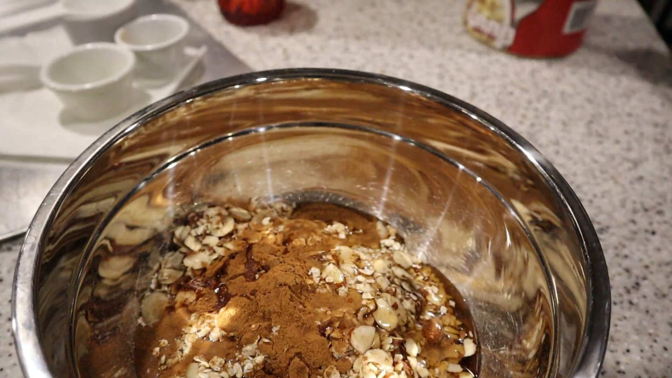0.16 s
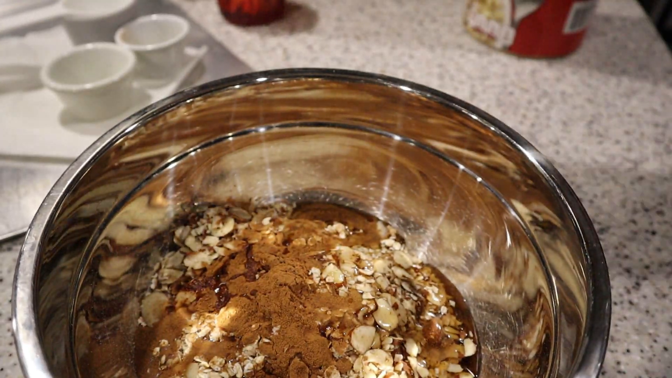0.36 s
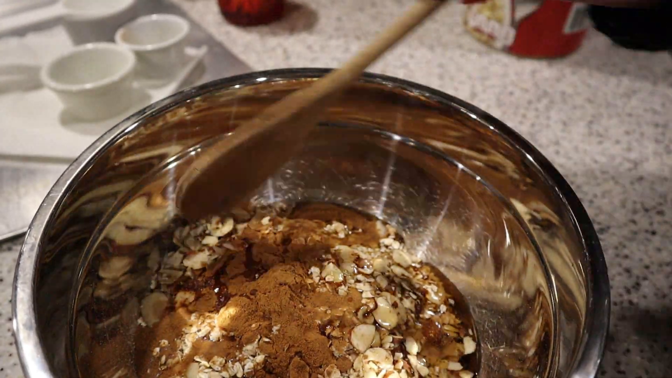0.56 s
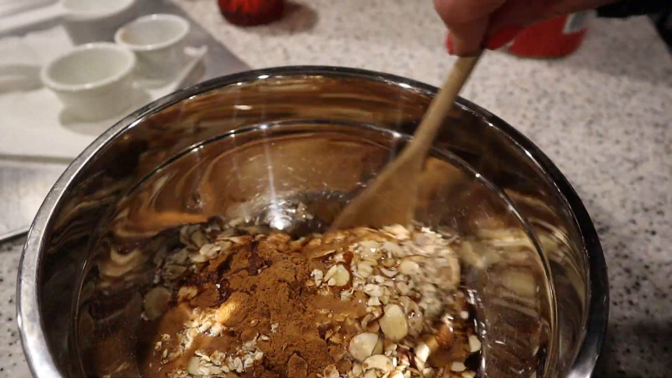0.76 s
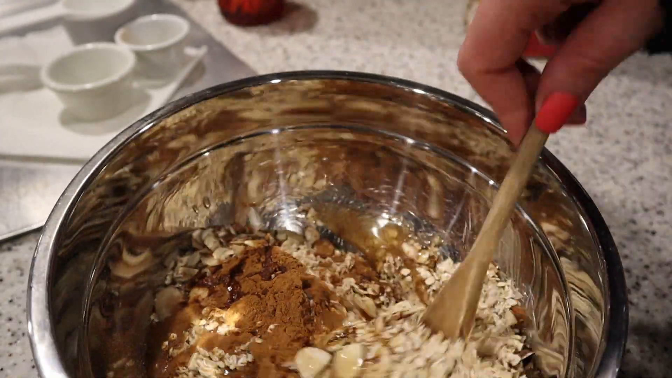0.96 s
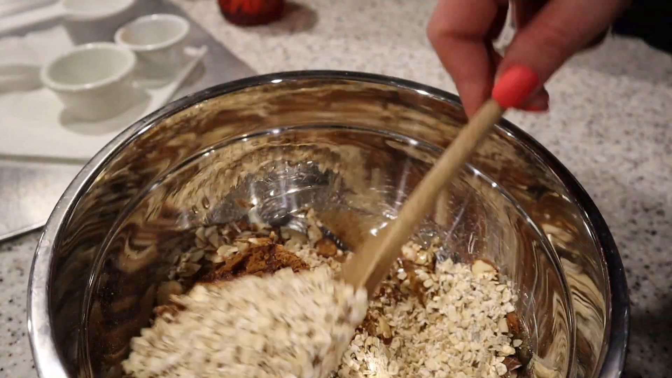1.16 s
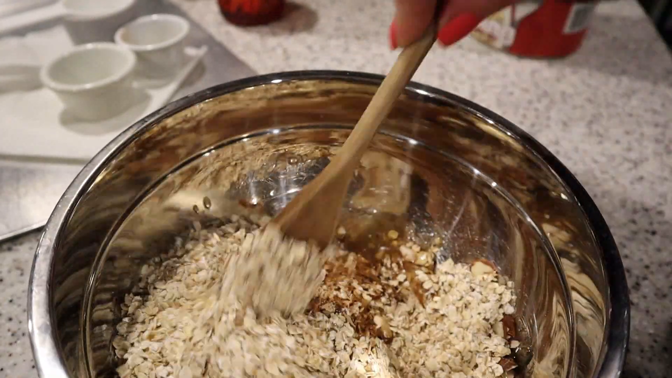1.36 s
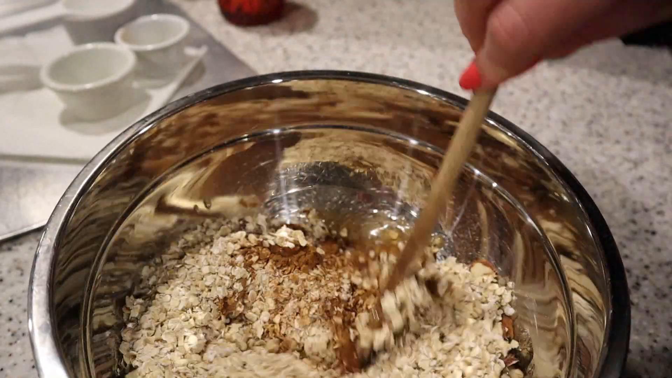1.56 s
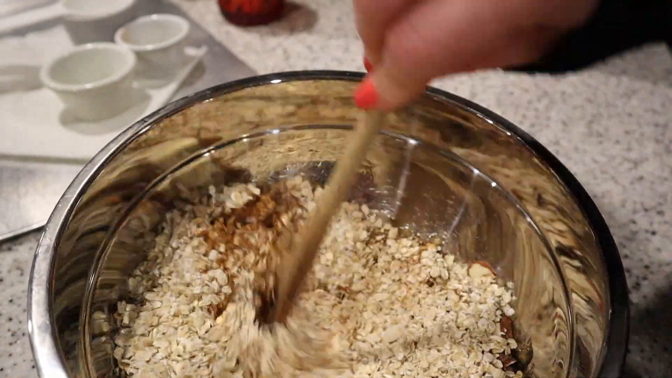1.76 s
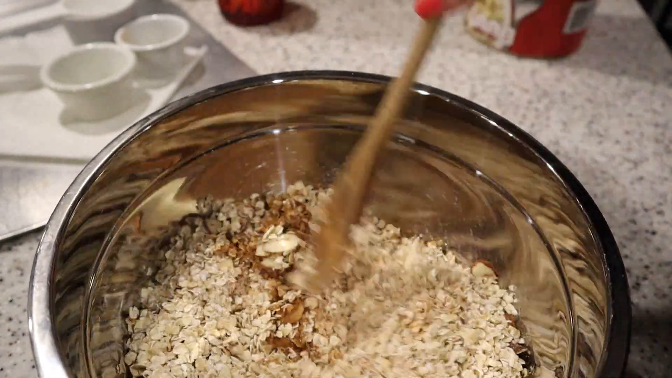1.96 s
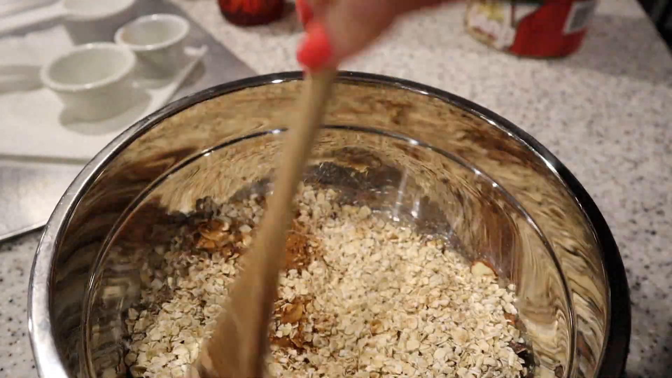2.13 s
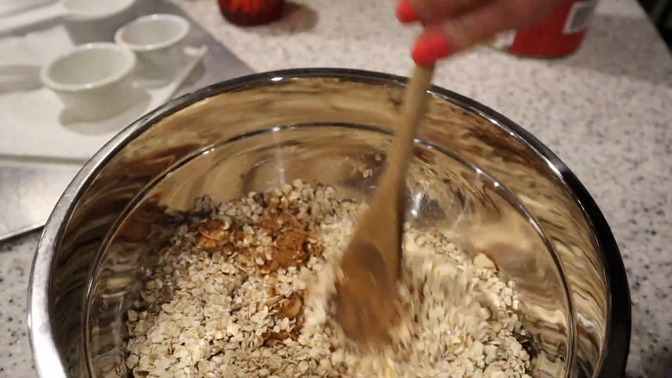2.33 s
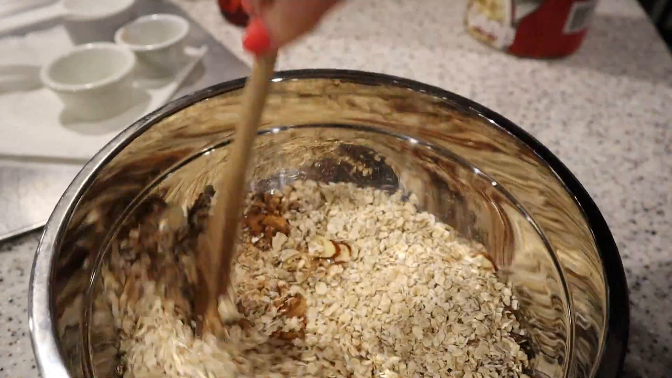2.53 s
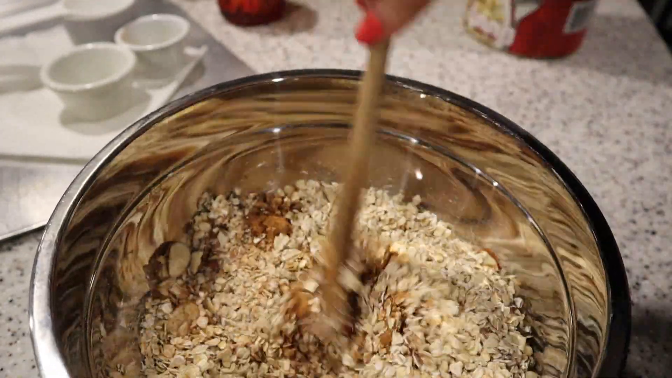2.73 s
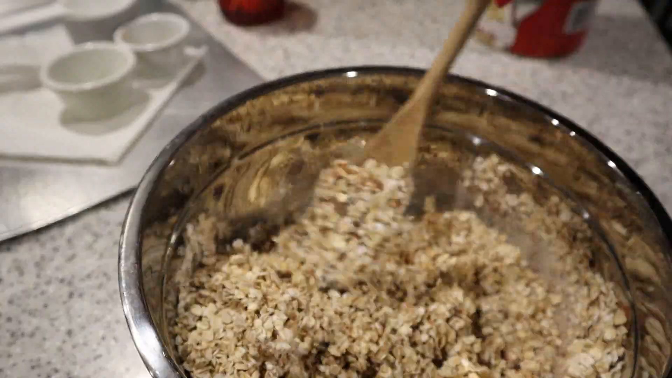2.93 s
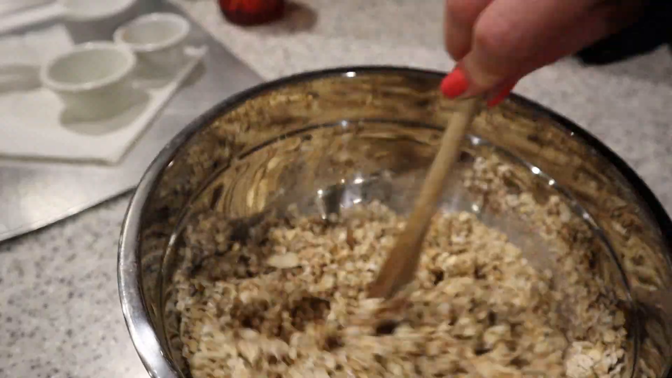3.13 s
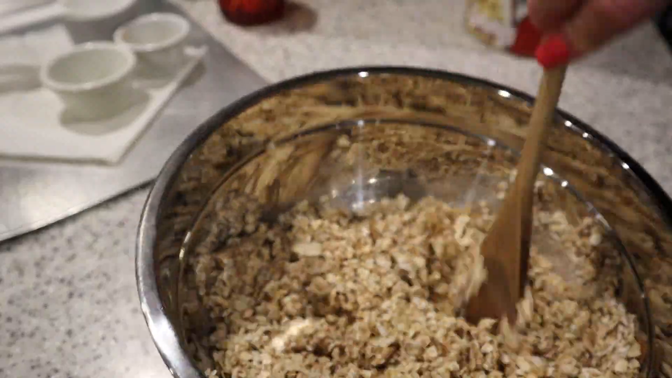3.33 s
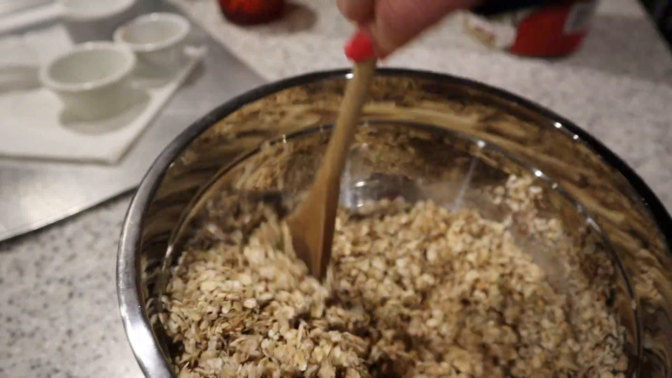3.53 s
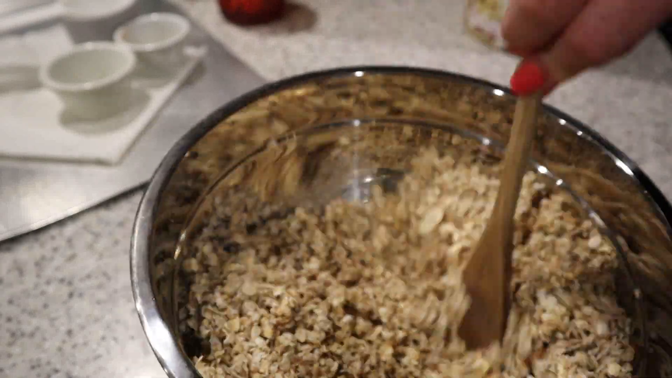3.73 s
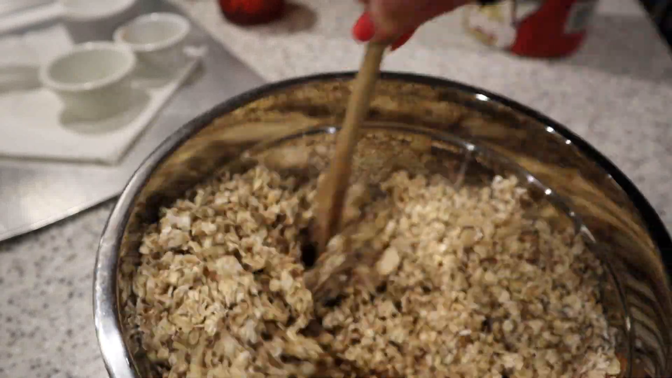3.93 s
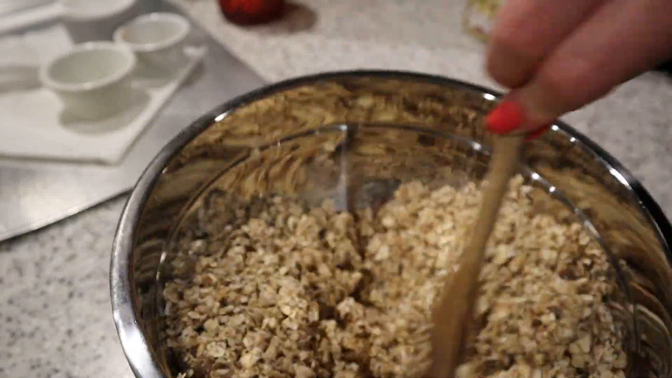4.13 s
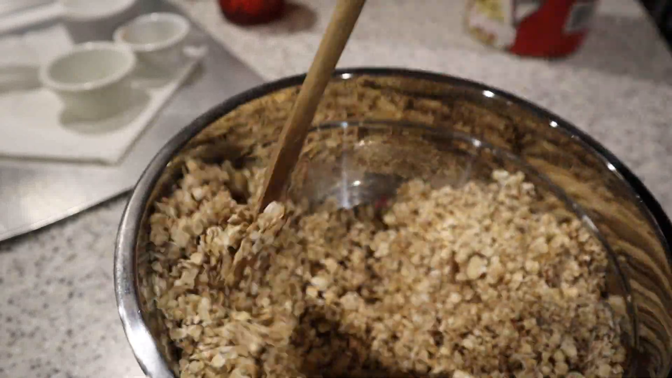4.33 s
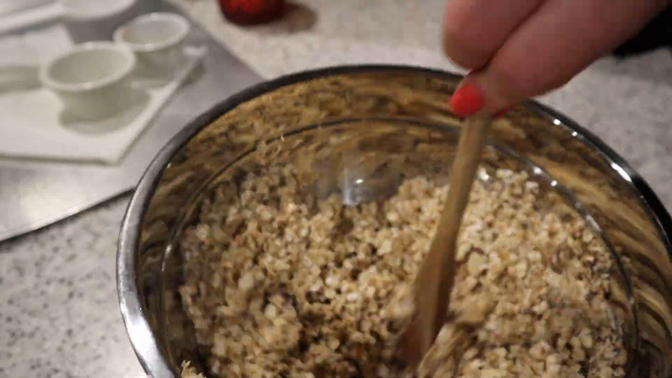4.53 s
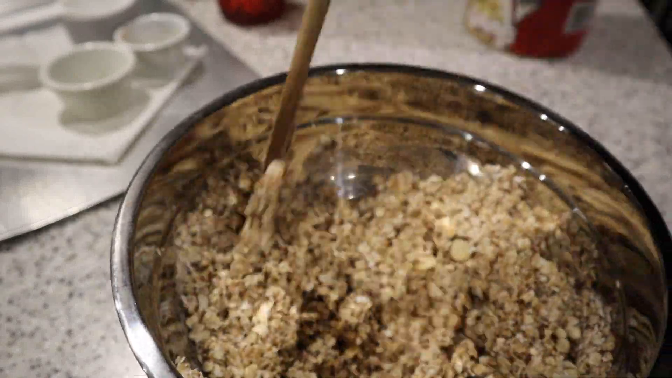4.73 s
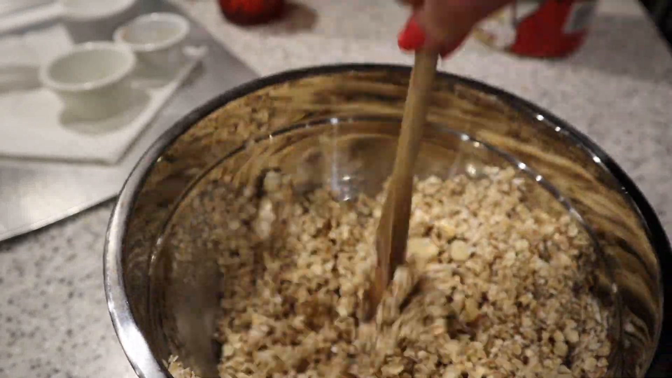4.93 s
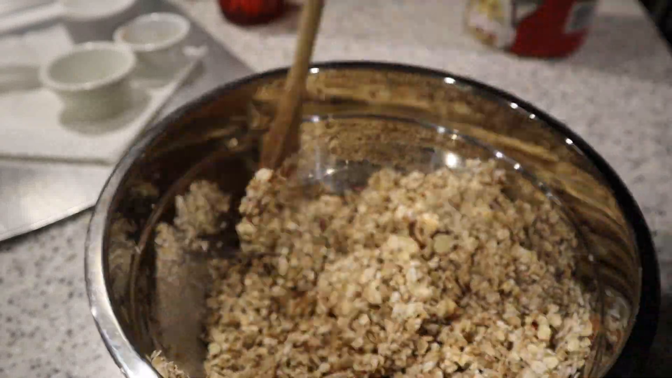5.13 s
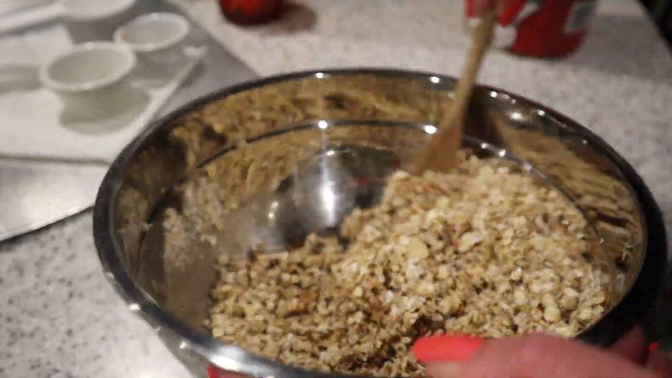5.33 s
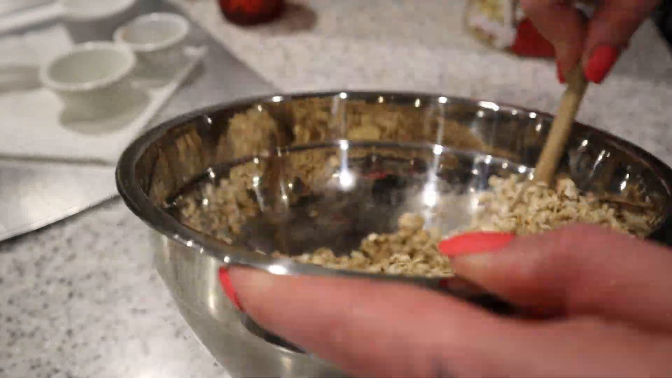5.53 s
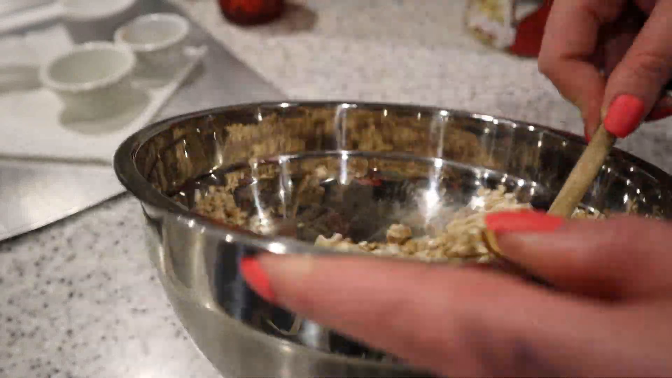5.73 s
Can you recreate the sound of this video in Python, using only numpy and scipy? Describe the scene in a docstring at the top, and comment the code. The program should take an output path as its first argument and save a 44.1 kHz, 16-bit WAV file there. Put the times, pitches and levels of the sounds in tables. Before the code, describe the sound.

Close-up kitchen stirring: a hard wood-on-metal clack, then crunchy oat strokes with pinging nuts, small snaps and dull thumps over low hum.

```python
"""Close to a small stereo microphone on a kitchen counter, over steady hum (coloured noise): soft brushing noise swishes
and one faint knock lead in, then a wooden spoon lands on a steel bowl with a cracking, ringing clack (pulse and modes).
Strokes through oats, nuts and syrup follow to the end: grains of noise rustle and crunch, flakes spill, nuts ping
and skitter, brittle bits snap. Stick-slip tones squeak and filtered grit scrapes now and then; further knocks make the
bowl thump on the counter (low modes), hardest around 3 s. A short diffuse tail sets it all in a small room."""
import sys
import numpy as np
from scipy import signal
from scipy.fft import rfft, irfft
from scipy.io import wavfile
from scipy.ndimage import uniform_filter1d

SR = 44100
rng = np.random.default_rng(int(sys.argv[2]) if len(sys.argv) > 2 else 0)


def dump(signal):
    """Clip the signal to [-1, 1] and save it as 16-bit WAV at the path in sys.argv[1]."""
    limited = np.clip(np.atleast_2d(signal).T, -1, 1)
    pcm = np.round(limited * 32767).astype(np.int16)
    wavfile.write(sys.argv[1], SR, pcm)


N = 254898  # samples

# All table levels are relative: layer gains come on top.
# Kitchen hum and air: [f/Hz, density/dB]
HUM = [(12, -56), (20, -7.5), (54, -3.5), (97, -5), (128, 1), (229, -10.5), (286, -9), (347, -9.5),
       (555, -18.5), (674, -16.5), (1300, -21.5), (4200, -29.5), (12700, -43.5), (15000, -70)]
# Side over mid at the microphone: [f/Hz, ratio/dB]
SIDE_OVER_MID = [(60, -22), (120, -41), (210, -26), (400, -14), (750, -5.5), (1300, -6), (2400, -4),
                 (4400, 1), (8000, 1.5), (9500, 6.5), (12000, 7.5), (15000, 61)]
# Soft swishes as the spoon is brought over the bowl: [t/s, length/s, level/dB, treble offset/dB]
SWISHES = [(0.027, .16, -57.5, 2), (0.233, .13, -48.5, 0), (0.288, 0.31, -52, -6)]
# Colour of a swish below its treble: [f/Hz, density/dB]
SWISH_COLOUR = [(700, -21), (1800, -4), (2800, 0), (4200, -9), (7000, -12.5)]
# Wood slipping on steel: [t/s, length/s, f/Hz, tone level/dB, rasp level/dB]
SQUEAKS = [(1.188, 0.065, 7340, -39, -55), (2.581, 0.032, 3810, -33, -32.5),
           (3.042, 0.024, 2903, -38.5, -38)]
# The slipping beside the squeak's tone: [ratio to its pitch, density/dB]
RASP = [(.5, -22), (.85, 0), (1.05, -2), (1.3, -3), (1.6, -2), (2.6, -8), (4, -26)]
# The spoon grinding oats along the wall: [t/s, length/s, first centre f/Hz, level/dB]
SCRAPES = [(1.596, 0.079, 1380, -32.5), (1.66, 0.081, 1190, -44), (2.691, 0.15, 2100, -46),
           (3.455, 0.072, 1300, -38.5), (4.146, 0.082, 2150, -37), (4.97, 0.076, 1570, -39.5)]
# Flakes spilling off the spoon onto bare steel: [t/s, time scale/s, level/dB]
SPILLS = [(0.933, .2, -38), (1.16, 0.085, -38), (1.297, 0.18, -31), (1.442, 0.096, -31),
          (1.747, 0.091, -29.5), (2.068, 0.13, -46), (2.495, 0.26, -34), (2.82, 0.38, -48.5),
          (4.806, 0.11, -32.5), (5.212, 0.14, -32.5)]
# Brittle bits cracking under the spoon: [t/s, level/dB, lower edge f/Hz, splinter time/s]
SNAPS = [(0.903, -17, 5600, 0.0038), (1.3175, -19, 2700, .002), (1.3255, -19, 3000, 0.0052),
         (1.364, -17, 3500, .003), (2.2135, -24, 3520, 0.0066), (2.488, -10.5, 4420, 0.0014),
         (2.7348, -23, 2500, 0.0028), (2.854, -22, 4400, .003), (3.99, -26, 4800, 0.0037),
         (4.186, -23, 2400, .003), (4.3875, -29, 4000, .002), (4.428, -21, 4200, .002),
         (4.4443, -14.5, 4000, 0.018), (4.7976, -20, 4500, 0.0017), (5.062, -20, 2800, 0.0021),
         (5.198, -17, 4600, .002), (5.6057, -10.5, 3080, 0.0037)]
# Nuts hitting the wall: [t/s, level/dB, ring f/Hz, skitter time/s]
TICKS = [(0.7268, -15, 7400, 0.0034), (0.8446, -16, 8250, .0065), (1.1875, -30, 7600, 0.011),
         (1.3055, -24, 7300, .003), (1.3255, -11.5, 7360, 0.004), (1.335, -18.5, 7400, .006),
         (1.377, -16, 7240, 0.0087), (1.4507, -14, 8000, 0.0041), (1.4725, -16, 8000, .005),
         (1.7698, -14.5, 8300, .005), (1.7835, -19, 7440, .003), (1.798, -19, 7500, 0.005),
         (2.1208, -21, 7720, 0.0023), (2.1494, -21.5, 7740, 0.0033), (2.1835, -17, 7500, 0.003),
         (2.202, -21, 7660, 0.0068), (2.2127, -16, 7280, 0.0079), (2.494, -14, 7900, .002),
         (2.5, -11, 7960, 0.006), (2.5073, -10, 8200, 0.007), (2.5195, -14, 8400, .003),
         (2.5355, -19.5, 7900, .003), (2.5490, -9.5, 7930, 0.005), (2.556, -17, 7700, .012),
         (2.855, -15, 7500, 0.0084), (2.9123, -7, 7750, 0.005), (2.9602, -26, 7850, .003),
         (3.0125, -16.5, 7680, 0.0043), (3.062, -18, 8000, 0.006), (3.7758, -13.5, 8300, 0.0065),
         (4.0899, -8, 8300, .003), (4.4275, -18, 7840, 0.005), (4.4460, -16, 8200, 0.021),
         (4.7991, -10.5, 8060, 0.0067), (4.8255, -19, 7300, 0.0027), (4.8325, -17, 7350, 0.0018),
         (5.1982, -20.5, 7400, 0.0089)]
# Dry click beside a nut's ping: [f/Hz, density/dB]
CLICK = [(500, -47), (2500, -30), (5200, -3.5), (6300, -3), (8000, 2), (10000, 3), (12500, -4),
         (15500, -32)]
# The spoon knocking: [t/s, clack level/dB, thump level/dB, contact brightness f/Hz]
KNOCKS = [(0.102, -35, -55, 1390), (0.9984, -28, -45.5, 1760), (1.3065, -31, -62, 1710),
          (1.3250, -26.5, -66, 1650), (1.703, -25.5, -53, 1600), (2.3650, -19.5, -25, 1830),
          (2.997, -9.5, -10, 1750), (3.0003, -14, -15, 1850), (3.043, -24, -29.5, 686),
          (3.299, -29.5, -47.5, 604), (3.4221, -28, -22, 754), (3.7842, -16.5, -15, 1430),
          (3.832, -34, -27, 705), (3.915, -22.5, -27.5, 730), (4.0651, -25, -42, 1100),
          (4.1025, -13, -21, 2200), (4.183, -38, -29.5, 800), (4.2666, -22, -60, 2660),
          (4.5389, -26, -32.5, 950), (4.8790, -28.5, -34, 720), (5.1995, -20.5, -33.5, 1250)]
# Ringing wall of the bowl, before the spread of each blow: [f/Hz, level/dB, t60/s]
WALL_MODES = [(266, -10.5, 0.28), (545, -15, .12), (640, -13, .16), (668, -10, 0.22), (779.5, -1.5, 0.4),
              (782, -5.5, 0.36), (892, -16, 0.3), (1170, -9, .11), (1318, .5, 0.24), (1473, -9, 0.15),
              (1701, -11, 0.16), (2820, -15, .11), (3910, -20, 0.3), (4010, -20, 0.3), (4103, -17, 0.25)]
# Loaded bowl rocking on the counter, before the spread of each blow: [f/Hz, level/dB, t60/s]
ROCK_MODES = [(93, -7.5, 0.36), (135, -1, 0.24), (151, -5, 0.22), (203, 1.5, 0.22), (220, -8, 0.2),
              (236, -13, 0.16), (326, -9, 0.2), (385, -18, .12)]
# Hard crack of the first landing: [f/Hz, density/dB]
CRACK = [(250, -14), (500, 0), (1200, 12), (2000, 1), (2800, 2), (4000, -6), (10000, -7), (15000, -21)]
# Strokes of the spoon; the fall is by 20 dB:
# [t/s, rise/s, hold/s, fall/s, flake hiss level/dB, heap crunch level/dB, wall pressure over crunch/dB]
STROKES = [(0.698, 0.061, 0.089, 0.22, -37, -43, 2.5), (0.845, 0.11, .12, 0.4, -39, -58, 11),
           (1.294, 0.014, 0.016, 0.5, -45.5, -44, -28), (1.406, 0.19, 0.017, 0.4, -41.5, -41, -14),
           (1.655, 0.09, 0.21, 0.21, -40, -43, -2), (2.211, 0.03, 0.085, 0.7, -41, -43, -6.5),
           (2.502, 0.13, 0.11, 0.16, -39.5, -41.5, -4.5), (3.114, 0.1, 0.04, 0.52, -41, -42, -3),
           (3.408, 0.1, 0.033, 0.13, -38, -43, -7), (3.579, 0.17, 0.015, 0.46, -32.5, -41, 0),
           (3.787, 0.3, 0.095, 0.29, -34.5, -42, -5), (4.495, 0.048, 0.115, 0.125, -37.5, -40.5, -2),
           (4.831, 0.051, 0.1, 0.14, -38.5, -44, 0), (5.19, 0.0081, 0.13, 1, -41, -54.5, 9.5),
           (5.295, 0.12, .42, .5, -39.5, -48.5, 7)]
# Flakes sliding on flakes: [f/Hz, density/dB]
HISS = [(500, -32), (2000, -14.5), (3300, -10.5), (5200, -10), (6500, -5.5), (8500, -1.5), (10000, -1.5),
        (12000, -2.5), (13000, -11), (14200, -22), (16000, -36)]
# Single dry flakes breaking: [f/Hz, density/dB]
CRACKLE = [(400, -13), (1200, -9), (3000, -5), (6000, -12), (8500, 5), (12000, 2), (15000, -20)]
# Crumbs of the pushed heap: [f/Hz, density/dB]
CRUNCH = [(50, -19.5), (150, 4), (260, -1.5), (420, -13.5), (650, -7.5), (900, -10.5), (1250, 1),
          (2100, -3.5), (3100, -3.5), (5000, -5), (9000, -32)]
# Wall driven by pressed oats: [f/Hz, density/dB]
BODY = [(100, -26), (250, 2.5), (400, -1.5), (600, 5), (900, -3), (1230, 4), (1900, -17.5), (2500, -15),
        (3200, -6), (5000, -41.5)]
# Sticky clumps breaking up: [f/Hz, density/dB]
CLUMP = [(300, -16), (800, -6), (1400, -1), (3000, 0.5), (5500, -3.5), (9000, -6), (14000, -34)]

HUM_DB = -46.5
SQUEAK_GLIDE, SQUEAK_WAVER, SQUEAK_T60_S = -.02, .018, .09  # glide and waver as shares of the pitch
SCRAPE_WIDTH, SCRAPE_RISE = 0.65, 1.16  # width of each resonance and final centre, as ratios to a centre
SPILL_RISE, SPILL_HOLD = 0.17, 0.095  # shares of the time scale
SPILL_PER_S, SPILL_SPREAD_DB = 700, 4
SKITTER_DB = -5  # largest bounces relative to the first hit
TICK_BLUR_DB, TICK_BLUR_S = -4, .008
CLICK_DB, CLICK_RISE = 6, 0.34  # click gain for a 0 dB hit; dB it drops per dB of a softer hit
KNOCK_TAIL_DB, STRIKE_TAIL_DB = -24.5, -31  # reflections inside the bowl after a blow
THUMP_RISE_S, THUMP_DAMP_S, THUMP_FREE = .004, .021, .26  # the last is the share that rings on
ROCK_DETUNE = .004  # spread as a share of the pitch
STRIKE_S, STRIKE_RIGHT_DB = 0.7095, 0.2  # the first landing; right up and left down by this much
CRACK_DB, CRACK_T60_S = -7, .006
RING_DB, STRIKE_ROOM_DB = -8, -3.5  # free ring of the landing; how much of the landing the room gets
STOP_CURVE = 1.2  # above 1, a stroke dies away ever faster as the spoon comes to rest
FLAKES_PER_S, CRUMBS_PER_S, SCRATCHES_PER_S = 9000, 2200, 3200  # flakes at an average stroke
FLAKE_SPREAD_DB = 3.9
CRACKLE_DB, CRACKLE_PER_S, CRACKLE_SPREAD_DB = -4, 150, 4.2
CLUMP_DB, CLUMP_PER_S, CLUMP_SPREAD_DB = -6.5, 45, 4.5
ZING_DB = -4  # flakes dragged over bare steel
HISS_DB, BODY_DB = 2.5, -5
HISS_FITS_DB, CRUNCH_FITS_DB = 1.07, 1.1  # how much the spoon catches and slips
HISS_SHIFT_DB, CRUNCH_SHIFT_DB = 1.6, 2.1  # spread of the moving spectral patches
SING_DB, SING_T60_S = -14, .06  # the wall's modes under the stirring, damped by the heap
TOP_HZ = 15600  # upper edge of the recorder's band


def undb(db):
    """Decibels to gain."""
    return 10 ** (np.asarray(db) / 20)


def unit(x):
    """Scale to rms 1."""
    return x / np.sqrt(np.mean(x ** 2))


def clock(seconds):
    """Time axis of a short sound, in s."""
    return np.arange(max(int(seconds * SR), 2)) / SR


def gains(points, size):
    """Gain of a (Hz, dB) outline on the bins of a transform, interpolated over log frequency."""
    hz, db = np.transpose(points)
    bins_hz = np.arange(size // 2 + 1) * SR / size
    return undb(np.interp(np.log(bins_hz + 1), np.log(hz), db))


def colour(x, points):
    """Causal minimum-phase filter with the given outline, by folding its cepstrum."""
    size = 4096
    cepstrum = irfft(np.log(gains(points, size)))
    cepstrum[1:size // 2] *= 2
    cepstrum[size // 2 + 1:] = 0
    response = irfft(np.exp(rfft(cepstrum)))
    return signal.fftconvolve(x, response)[:len(x)]


def resonate(x, hz, width_hz):
    """One resonance, gain 1 at its centre."""
    return signal.lfilter(*signal.iirpeak(hz, hz / width_hz, fs=SR), x)


def fade(t, t60):
    """Exponential decay by 60 dB in t60."""
    return np.exp(-np.log(1000) * t / t60)


def swell(s, rise_s, hold_s, fall_s, curve=1):
    """Envelope that rises to 1, holds, then dies away by 20 dB in the fall time."""
    t = np.arange(N) / SR - s
    falling = np.maximum(t - rise_s - hold_s, 0) / fall_s
    return np.clip(t / rise_s, 0, 1) * 10 ** -np.minimum(falling ** curve, 10)


def walk(rate):
    """Random wander at about the given rate in Hz; rms 1."""
    k = int(SR / rate)
    steps = np.repeat(rng.standard_normal(N // k + 1), k)
    return unit(uniform_filter1d(steps, k)[:N])


def grains(rate, spread_db, length):
    """Random tiny impacts of very unequal size; rms 1."""
    hit = rng.random(length) < rate / SR
    size = undb(spread_db * np.minimum(rng.standard_normal(length), 2.6))
    return unit(hit * size * rng.choice([-1, 1], length) + 1e-9)


def chatter(length_s, rate, count):
    """A run of uneven bounces or slips that dies away over about the given length."""
    force = np.zeros(count)
    gaps = rng.uniform(.3, 1.7, 400)
    size = rng.uniform(.4, 1, 400) * rng.choice([-1, 1], 400)
    when = np.cumsum(gaps) / rate
    keep = when * SR < count - 1
    force[(when[keep] * SR).astype(int)] = (size * np.exp(-(when / length_s) ** 3))[keep]
    return force


def shimmer(x, tail_db, tail_t60):
    """Every contact rings its own mix of the wall's countless high modes: a brief noise tail, new each time."""
    tail = fade(clock(.15), tail_t60) ** 2
    power = np.abs(signal.fftconvolve(x ** 2, tail / tail.sum())[:len(x)])
    blur = np.sqrt(power) * rng.standard_normal(len(x))
    return (x + undb(tail_db) * blur) / np.hypot(1, undb(tail_db))


def steel(x, tail_db, tail_t60):
    """The wall's countless high modes and the echoes inside the bowl blur contacts into a brief shimmer."""
    t = clock(.15)
    response = rng.standard_normal(len(t)) * fade(t, tail_t60)
    response *= undb(tail_db) / np.linalg.norm(response)
    response[0] = 1  # direct sound
    return signal.fftconvolve(x, response / np.linalg.norm(response))[:len(x)]


def ring(modes, detune, uneven_db):
    """Decaying modes, a little different with the place of every blow; peak 1."""
    t = clock(.5)
    y = np.zeros(len(t))
    for hz, db, t60 in modes:
        level = undb(db + uneven_db * rng.standard_normal())
        pitch = hz * (1 + detune * rng.standard_normal())
        y += level * fade(t, t60) * np.sin(2 * np.pi * pitch * t)
    return y / np.abs(y).max()


def clack(bright_hz, tail_db, tail_t60, treble_db):
    """One push and rebound of the wall, then its quick reflections inside the bowl; peak 1."""
    t = clock(.2)
    force = undb(tail_db) * rng.standard_normal(len(t)) * fade(t, tail_t60)
    force[0] = 1
    outline = [(30, -44), (100, -20), (300, -5), (.5 * bright_hz, 0), (0.97 * bright_hz, -2),
               (1.7 * bright_hz, treble_db), (5 * bright_hz, treble_db - 4.5), (17000, treble_db - 7.5)]
    y = colour(force, outline)
    return -y / np.abs(y).max()


def add(track, s, sound):
    """Mix a sound into a track at a given time."""
    i = int(s * SR)
    track[..., i:i + sound.shape[-1]] += sound[..., :N - i]


def stereo(mid, side):
    """Close capsules: shared bass; the treble lies mostly in their difference, a quarter cycle off."""
    width = gains(SIDE_OVER_MID, N)
    share = 1 / np.sqrt(1 + width ** 2)
    mid = irfft(rfft(mid) * share, N)
    side = irfft(-1j * rfft(side) * share * width, N)
    return np.array([mid + side, mid - side])


def scatter(impacts, body):
    """Impacts from all over the bowl, each on its own side, sounding through a body."""
    mid = unit(body(impacts))
    side = unit(body(impacts * rng.choice([-1, 1], N)))
    return stereo(mid, side)


def coloured(impacts, tail_db, tail_t60, outline):
    """Scattered impacts, each with its shimmer, through one colour."""
    return scatter(impacts, lambda x: colour(shimmer(x, tail_db, tail_t60), outline))


def shift(x, depth_db):
    """As the spoon and the heap move, patches of the spectrum come and go."""
    spec = signal.stft(x, nperseg=512)[2]
    field = rng.standard_normal(spec.shape[1:])
    for _ in range(2):
        field = uniform_filter1d(uniform_filter1d(field, size=5, axis=0), size=9, axis=1)
    return signal.istft(spec * undb(depth_db * unit(field)))[1][:, :N]


def zing(impacts, hz, width_hz):
    """Flakes on bare steel ring the high modes of the wall."""
    def bare_wall(x):
        return steel(resonate(resonate(x, hz, width_hz), hz, 2000), -4.0, 0.052)
    return shift(scatter(impacts, bare_wall), 1.1)


def hum():
    """Steady low hum of the room under a faint wide hiss."""
    mid, side = (unit(colour(rng.standard_normal(N), HUM)) for _ in range(2))
    side_outline = [(50, -33), (120, -18.0), (300, -4.0), (500, 0.0), (2000, 4.5), (5000, 8.0), (12000, 9)]
    side = colour(side, side_outline)
    return undb(HUM_DB + 0.12 * walk(1.0)) * np.array([mid + side, mid - side])


def kitchen(sound):
    """Short diffuse tail from the counter and cupboards: decaying noise convolved with the mono sound."""
    t = clock(.5)
    envelope = fade(t, 0.2) * (1 - np.exp(-t / 0.015))
    outline = [(100, 0.0), (400, -2.0), (2000, -0.5), (8000, 2.5), (15000, -32)]
    tails = [colour(rng.standard_normal(len(t)) * envelope, outline) for _ in sound]
    mono = sound.mean(axis=0)
    wet = [signal.fftconvolve(mono, tail)[:N] / np.sqrt(np.sum(envelope ** 2)) for tail in tails]
    return undb(-9.5) * stereo(*wet)


def swishes():
    """Faint brushing as hand and spoon move towards the bowl: coloured grains that swell and fade."""
    track = np.zeros((2, N))
    for s, length, db, treble_db in SWISHES:
        t = clock(length)
        envelope = np.sin(np.pi * t / t[-1]) ** 2
        treble = [(10000, treble_db - 5), (13000, treble_db - 6), (15500, treble_db - 28)]
        for channel in track:
            brush = unit(colour(grains(9000, 3, len(t)), SWISH_COLOUR + treble))
            add(channel, s, undb(db) * envelope * brush)
    return stereo(*track)


def squeaks():
    """The spoon's edge sticks and slips in step with one wall mode: a thin, sagging, ringing tone and a rasp."""
    track, t = np.zeros((2, N)), clock(.25)
    for s, length, hz, tone_db, rasp_db in SQUEAKS:
        along = np.minimum(t / length, 1)
        contact = np.sin(np.pi * along)
        ring_on = undb(-8.5) * along * fade(np.maximum(t - length, 0), SQUEAK_T60_S)
        envelope = np.maximum(contact, ring_on)
        waver = SQUEAK_WAVER * contact * walk(300)[:len(t)]
        pitch = hz * (1 + SQUEAK_GLIDE * (along - .5) + waver)
        tone = undb(tone_db) * envelope * np.sin(2 * np.pi * np.cumsum(pitch) / SR) * np.sqrt(2)
        for channel in track:
            slips = shimmer(grains(2600, 3, len(t)), -3, .02)
            rasp = unit(colour(slips, [(ratio * hz, db) for ratio, db in RASP]))
            add(channel, s, tone + undb(rasp_db) * envelope * rasp)
    return stereo(*track)


def scrapes():
    """The spoon's face grinds oats along the wall: a broad rasp whose centre rises as the contact tightens."""
    track = np.zeros((2, N))
    for s, length, hz, db in SCRAPES:
        t = clock(length)
        along = t / t[-1]
        envelope = np.sin(np.pi * along) ** 2
        for channel in track:
            grit = shimmer(grains(2700, 3.5, len(t)), -3.5, 0.033)
            early, late = (unit(resonate(resonate(grit, f, SCRAPE_WIDTH * f), f, SCRAPE_WIDTH * f))
                           for f in (hz, SCRAPE_RISE * hz))
            add(channel, s, undb(db) * envelope * ((1 - along) * early + along * late))
    return stereo(*track)


def spills():
    """As the spoon turns, loose flakes patter on the bare wall in a shower that swells quickly and thins out."""
    flow = sum(undb(db) * swell(s, SPILL_RISE * length, SPILL_HOLD * length, length)
               for s, length, db in SPILLS)
    return undb(-4.5) * flow * zing(grains(SPILL_PER_S, SPILL_SPREAD_DB, N), 7730, 740)


def snaps():
    """A brittle bit cracks between spoon and wall: a dry, wide click with a few splinters after it."""
    track = np.zeros((2, N))
    for s, db, low_hz, length_s in SNAPS:
        outline = [(0.18 * low_hz, -18), (0.79 * low_hz, -15), (low_hz, 0), (1.05 * low_hz, -1),
                   (10500, -8), (15000, -26)]
        for channel in track:
            force = undb(-2.0) * chatter(length_s, 2200, count=4000)
            force[0] = 1
            add(channel, s, undb(db + 13) * colour(shimmer(force, -2, 0.04), outline))
    return stereo(*track)


def ticks():
    """A hard bit hits the wall with a brief high ping, then chatters along it; harder hits click more."""
    track = np.zeros((2, N))
    for s, db, hz, skitter_s in TICKS:
        for channel in track:
            force = undb(SKITTER_DB) * chatter(skitter_s, 1700, count=6000)
            force[0] = 1
            force = shimmer(force, TICK_BLUR_DB, TICK_BLUR_S)
            ping = 7 * steel(resonate(resonate(force, hz, 386), hz, 2700), -2.1, 0.089)
            click = undb(CLICK_DB + CLICK_RISE * db) * colour(shimmer(force, -1.5, 0.11), CLICK)
            add(channel, s, undb(db + 6.5) * (ping + click))
    return stereo(*track)


def knocks():
    """A faint tap as the spoon is picked up; later it bumps the wall through the oats and the bowl thumps."""
    track, t = np.zeros((2, N)), clock(.5)
    # the thump is soon checked, then hums on faintly
    damping = THUMP_FREE + (1 - THUMP_FREE) * np.exp(-(t / THUMP_DAMP_S) ** 2)
    checked = (1 - np.exp(-t / THUMP_RISE_S)) * damping
    thump_outline = [(25, -18), (70, -2), (110, 0.5), (600, -4), (2000, -18.5)]
    for s, clack_db, thump_db, bright_hz in KNOCKS:
        thump = undb(thump_db + 11.5) * ring(ROCK_MODES, ROCK_DETUNE, 0.7) * checked
        for channel in track:
            add(channel, s, undb(clack_db + 1.0) * clack(bright_hz, KNOCK_TAIL_DB, 0.042, -23.5))
            add(channel, s, undb(clack_db - 30.0) * ring(WALL_MODES, 0.0034, 2.2))  # faint wall ring
            add(channel, s + 0.0024, colour(thump, thump_outline))
    return stereo(*track)


def strike():
    """The spoon first lands on the bare wall with a hard crack; the wall rings freely, the bowl rocks a little."""
    track, t = np.zeros((2, N)), clock(.05)
    for channel, db in zip(track, (-1.5, 0)):  # mid, side
        crack = colour(rng.standard_normal(len(t)) * fade(t, CRACK_T60_S), CRACK)
        blow = clack(1600, STRIKE_TAIL_DB, 0.088, -12.5)
        add(channel, STRIKE_S, undb(db + 9.5) * (.5 * blow + resonate(blow, 1400, 1200)) / 1.3)
        add(channel, STRIKE_S, undb(db + CRACK_DB) * crack)
        add(channel, STRIKE_S, undb(db + RING_DB) * ring(WALL_MODES, 0.0003, 0.32))
        add(channel, STRIKE_S, undb(db - 30) * ring(ROCK_MODES, 0.004, 0.93))
    return stereo(*track) * undb([[-STRIKE_RIGHT_DB], [STRIKE_RIGHT_DB]])


def stirring():
    """Each stroke speeds up, pushes on and slows; returns the gains of hiss, crunch and wall pressure."""
    power = np.zeros((3, N))
    for s, rise_s, hold_s, fall_s, hiss_db, crunch_db, press_db in STROKES:
        levels = undb([hiss_db, crunch_db, crunch_db + press_db])
        power += np.outer(levels, swell(s, rise_s, hold_s, fall_s, STOP_CURVE)) ** 2
    power[0] += 1e-10  # keeps the flake rate above zero
    return np.sqrt(power)


def rustle():
    """Flakes slide, scratch and crackle; clumps break and crunch in fits and starts and stir the wall's modes."""
    slide, push, press = stirring()
    fits = walk(70)

    rate = FLAKES_PER_S * unit(slide) ** .6  # a faster stroke moves more flakes
    thin = np.sqrt(np.mean(rate) / rate)  # evens out the power of dense and sparse flakes
    flakes = grains(rate, FLAKE_SPREAD_DB, N) * thin
    hiss = shift(coloured(flakes, -7, 0.06, HISS), HISS_SHIFT_DB)
    scratch = zing(grains(SCRATCHES_PER_S, 6.5, N), 8060, 930) * undb(ZING_DB + 2.4 * walk(45))
    breaking = grains(CRACKLE_PER_S, CRACKLE_SPREAD_DB, N)
    crackle = undb(CRACKLE_DB) * coloured(breaking, -2, 0.018, CRACKLE)

    def damped_wall(x):
        modes = ring(WALL_MODES, 0.0093, 2.4) * fade(clock(.5), SING_T60_S)
        return signal.fftconvolve(x, modes)[:N]

    crumbs = grains(CRUMBS_PER_S, 2.7, N)
    body = undb(BODY_DB) * press * coloured(crumbs, -2, 0.027, BODY)  # pressed oats drive the wall itself
    sing = undb(SING_DB) * scatter(crumbs, damped_wall)
    heap = push * (coloured(crumbs, -4.0, 0.053, CRUNCH) + sing)
    crunch = shift(heap + body, CRUNCH_SHIFT_DB)
    lumps = grains(CLUMP_PER_S, CLUMP_SPREAD_DB, N)
    clumps = undb(CLUMP_DB) * push * coloured(lumps, -4, 0.014, CLUMP)

    sliding = slide * (hiss * undb(HISS_DB + HISS_FITS_DB * fits) + scratch + crackle)
    return sliding + clumps + crunch * undb(CRUNCH_FITS_DB * fits)


def scene():
    """Everything in the bowl, its room and the background."""
    stir = swishes() + rustle() + scrapes() + spills() + ticks() + snaps() + squeaks() + knocks()
    landing = strike()
    room = kitchen(stir + undb(STRIKE_ROOM_DB) * landing)
    return stir + landing + room + hum()


def record(dry):
    """The recorder clips peaks beyond 0.95 of full scale, then a steep low-pass cuts the top."""
    low_pass = signal.ellip(8, .2, 70, TOP_HZ, fs=SR, output="sos")
    return signal.sosfilt(low_pass, np.clip(dry, -.95, .95))


dry = scene()
out = record(dry)
dump(out)
```